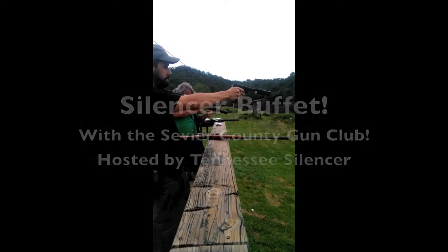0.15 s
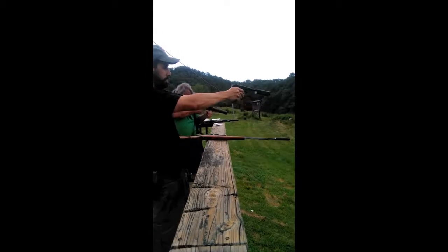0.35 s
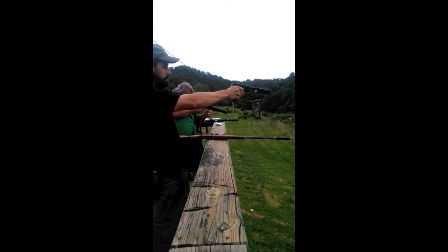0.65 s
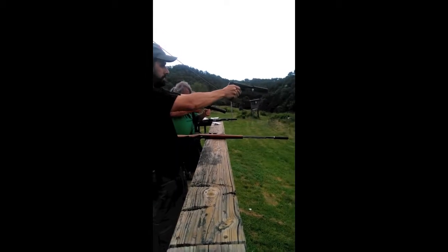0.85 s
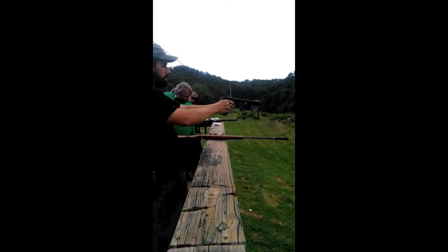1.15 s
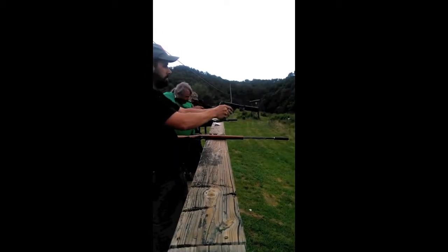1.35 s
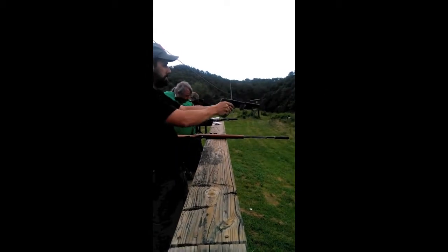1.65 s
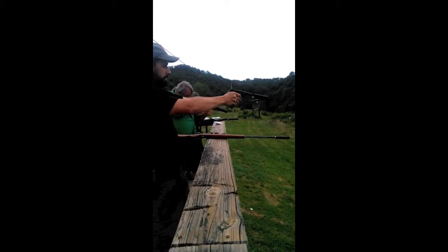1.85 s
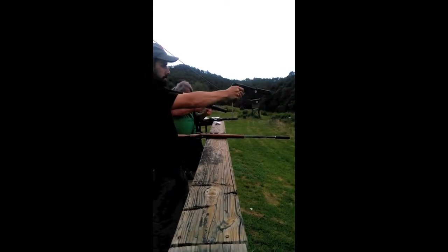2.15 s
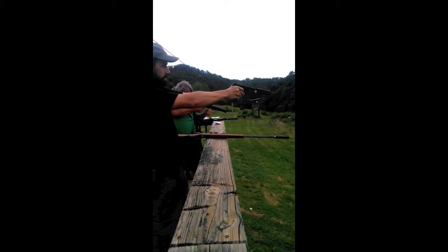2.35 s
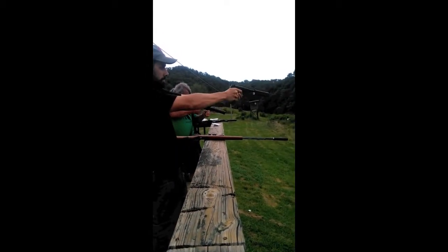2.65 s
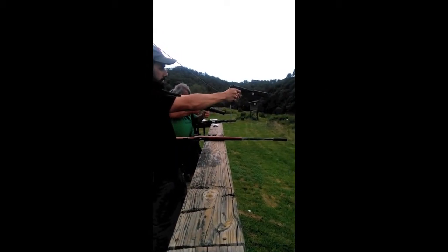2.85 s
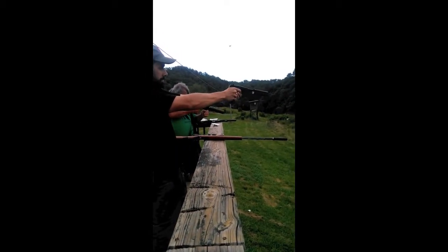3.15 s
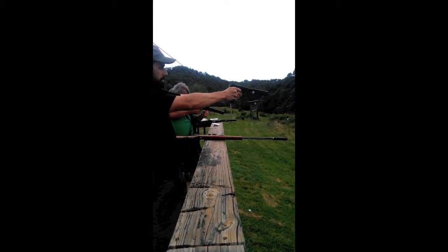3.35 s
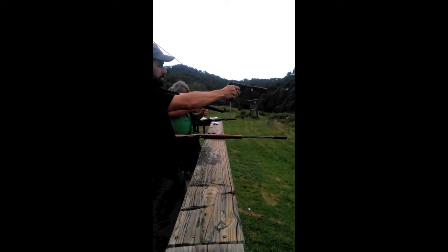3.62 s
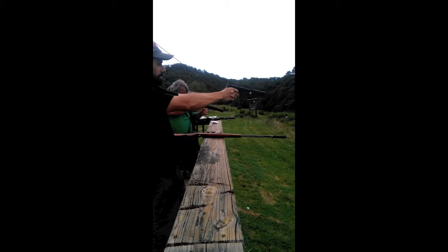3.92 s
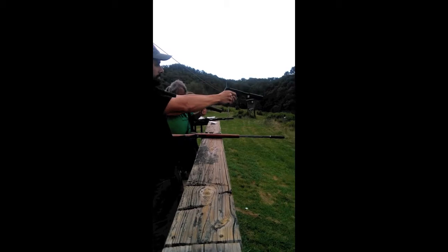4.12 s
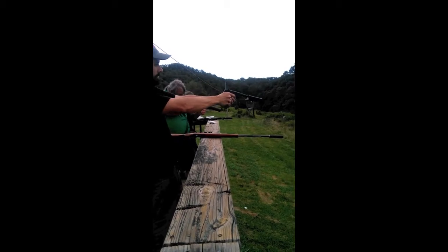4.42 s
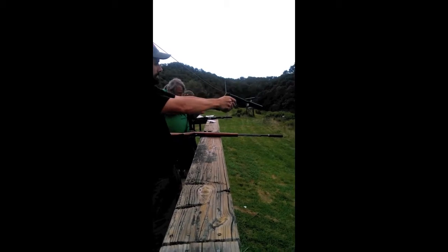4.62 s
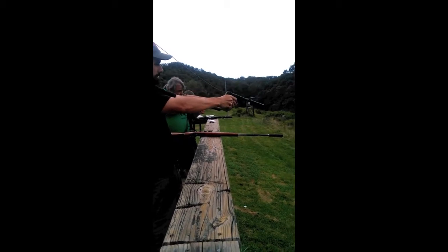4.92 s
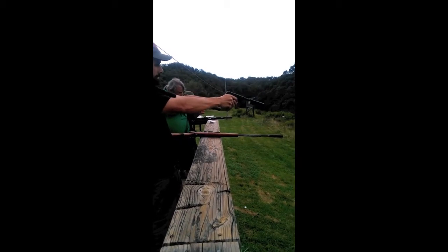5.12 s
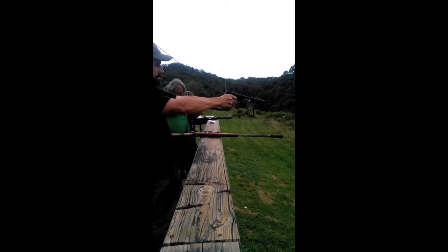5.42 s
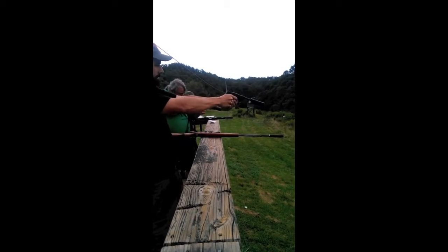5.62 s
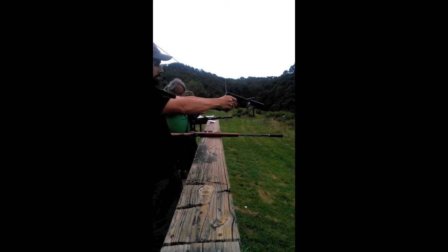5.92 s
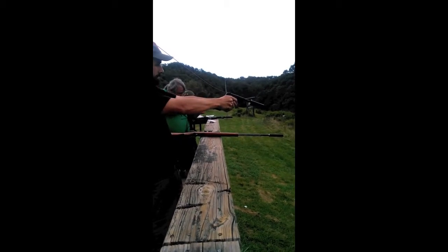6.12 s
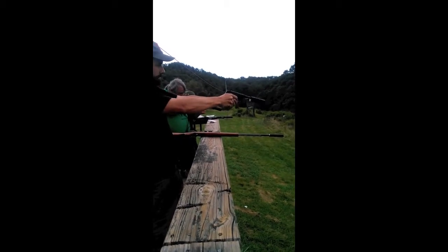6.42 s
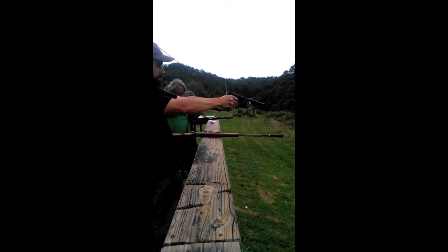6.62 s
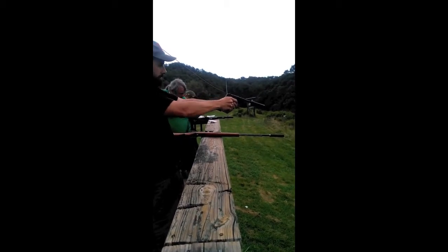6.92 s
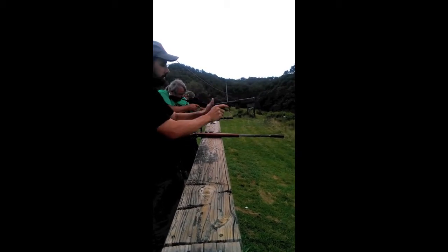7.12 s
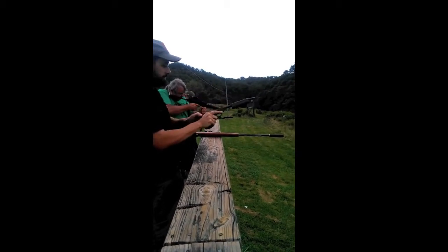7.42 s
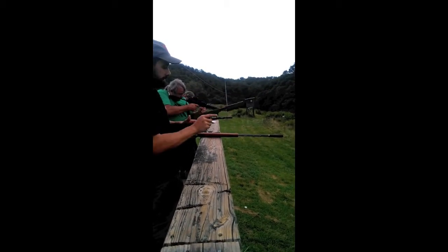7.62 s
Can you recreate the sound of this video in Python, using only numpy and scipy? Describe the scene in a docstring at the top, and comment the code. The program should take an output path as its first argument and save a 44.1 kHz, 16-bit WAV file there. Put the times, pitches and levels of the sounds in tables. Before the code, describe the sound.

A suppressed pistol right beside the microphone fires four widely spaced shots, each a harsh, clipped burst of gas followed at once by a slide clack and brief high steel ring. Neighbouring guns crack dryly, loudest in a tight cluster after three seconds. Distant bullet impacts, soft wooded-hill echoes, faint wind and a whistling finch fill the gaps. Near the end the pistol is handled and its slide clanks shut.

```python
"""Suppressed guns on a grassy range

A pistol beside the microphone overloads it: noise bursts for blast and slide, ringing sines for steel. Noise
bursts also make the neighbours' shots, bullets smacking into the berm, gun handling and bullets landing far
down the range. Wooded hills answer with soft swells of noise, and open-air scatter surrounds the shots. A finch
sings in gliding whistles; cloth rubs once, and near the end the pistol is handled. Below it all lies the faint
noise of wind and foliage."""
import sys
import numpy as np
from scipy import signal
from scipy.fft import rfft, irfft
from scipy.io import wavfile
from scipy.ndimage import map_coordinates

SR = 44100
rng = np.random.default_rng(int(sys.argv[2]) if len(sys.argv) > 2 else 0)


def pcm_store(signal):
    """Save signal as 16-bit PCM."""
    levels = np.round(np.clip(np.atleast_2d(signal), -1, 1) * 32767)
    wavfile.write(sys.argv[1], SR, levels.astype(np.int16).T)


N = 342216
TIME = np.arange(SR) / SR  # one second of time steps [s]

# rounds of the near pistol: (time [s], blast level [dB], slide shuts after [s], slide level [dB],
# steel ring level [dB], gas gust level [dB])
PISTOL_ROUNDS = [(0.8343, -3, 0.032, -12.5, -4, -35.5), (3.59, -2, .036, -12.5, -2.5, -36),
                 (5.507, -0.5, .036, -18, -4, -8.5), (6.4794, -2, 0.031, -19.5, -2.5, -43.5)]
# the slide dropped by hand: (time [s], steel ring level [dB])
SLIDE_DROP = (7.653, -7.5)
# sharp cracks far down the range, probably bullets on something hard:
# (time [s], level [dB], tilt [dB per octave], echo level [dB], echo's time to fall 60 dB [s])
FAR_CRACKS = [(1.482, -39.5, 4.5, -51, 1.15), (4.224, -37.5, -1, -44.5, .58)]
# colour of metal parts striking: (frequency [Hz], level [dB])
METAL_COLOUR = [(60, -26), (450, -27), (900, -23), (1700, -16.5), (3000, -4.5), (5200, -1.5), (7000, -3.5),
                (10000, -8), (14500, -18)]
# colour of dull thuds and the muzzle pop: (frequency [Hz], level [dB])
THUD_COLOUR = [(100, -14.5), (450, -3), (800, 2.5), (1200, -17.5), (1600, -19.5), (3000, -11.5),
               (12000, -41.5)]


def pistol(ripple_db):
    """Gas leaves the suppressor, the slide runs back to its stop, then slams shut."""
    # colour of the blast: (frequency [Hz], level [dB])
    blast_colour = [(30, -26.5), (60, -4.5), (200, -12.5), (550, -20.5), (850, -12), (1400, -18),
                    (2300, -11.5), (3300, -7.5), (4800, -8.5), (6300, -1.5), (8000, -5), (11000, -7.5),
                    (14500, -15.5)]
    out = np.zeros((2, N))
    for s, blast_db, cycle_s, slide_db, _, _ in PISTOL_ROUNDS:
        blast = burst(blast_colour, .16, rise_s=.0015, ragged_db=2.1, ripple_db=ripple_db)
        add(out, s, amp(blast_db) * blast)
        muzzle_pop = burst(THUD_COLOUR, .04)
        add(out, s, amp(blast_db - 15) * muzzle_pop)
        slide_stop = burst(METAL_COLOUR, .065, ripple_db=ripple_db)
        add(out, s + .65 * cycle_s, amp(slide_db - 3.5) * slide_stop)
        slide_slam = burst(METAL_COLOUR, .11, ripple_db=ripple_db)
        add(out, s + cycle_s, amp(slide_db) * slide_slam)
    return out


def close_up():
    """Ringing steel and gusts of gas: strong at the microphone, but they hardly carry."""
    out = np.zeros((2, N))
    for s, _, cycle_s, _, ring_db, gust_db in PISTOL_ROUNDS:
        add(out, s, amp(gust_db) * gust())
        add(out, s + cycle_s, amp(ring_db) * ring())
    drop_s, drop_db = SLIDE_DROP
    add(out, drop_s, amp(drop_db) * ring())
    return out


def ring(spread=.35):
    """The pistol's steel modes beat together; each reaches the two microphones in its own phase."""
    # ways the steel vibrates: (frequency [Hz], level [dB], time to fall 60 dB [s])
    steel_modes = [(1616, -37, 0.19), (4195, -24.5, 0.16), (4845, -21.5, .1), (6500, -23, .12),
                   (7900, -24, .1), (8590, 0, 0.12), (8759, -18, 0.089), (9340, -8, 0.089),
                   (9490, -2, 0.11), (9720, -14, 0.12), (9785, -9.5, 0.1), (9760, -5.5, 0.15),
                   (11570, -16.5, 0.14)]
    shared_phase = rng.random((len(steel_modes), 1, 1))
    phases = shared_phase + spread * rng.uniform(-1, 1, (len(steel_modes), 2, 1))  # in turns
    modes = 0
    for (hz, db, t60), phase in zip(steel_modes, phases):
        modes = modes + amp(db - 60 * TIME / t60) * np.sin(2 * np.pi * (hz * TIME + phase))
    return modes * (1 - np.exp(-TIME / .0016))


def gust(hz=62, crest_s=.019, width_s=.0099, edge=.27):
    """A puff of muzzle gas swings the diaphragms through a few lopsided cycles, the right one first."""
    left_right_delay = np.array([[.0012], [0]])
    turn = 2 * np.pi * hz * (TIME - crest_s - left_right_delay)
    swing = -np.cos(turn) + edge * np.sin(2 * turn) * np.exp(-TIME / .032)
    hump = (1 - np.exp(-TIME / .003)) / (1 + ((TIME - crest_s) / width_s) ** 4)
    return pan(-6.5) * swing * hump


def spring(hz=1626, db=-45, t60=.81):
    """A thin steel note, probably the recoil spring, sings on after the slide is dropped."""
    out = np.zeros((2, N))
    note = np.sin(2 * np.pi * hz * TIME) * (1 - np.exp(-TIME / .039))
    add(out, SLIDE_DROP[0], amp(db - 60 * TIME / t60) * note)
    return out


def neighbours(ripple_db):
    """The other guns along the line crack dryly, and bullets smack into the berm about 0.135 s after some
    shots: short bursts of coloured noise."""
    # shots, and bullets striking the berm (at 3.1594, 5.6438 and 6.6144 s): # (time [s], level [dB], time to
    # fall 60 dB [s], tilt [dB per octave], left-right [dB])
    shots = [(2.7738, -20, 0.089, 0, -2), (3.0266, -1, .2, 1, 2), (3.064, -6, .12, 0.5, -1.5),
             (3.1594, -7.5, .075, -3, 3), (5.478, -22, 0.14, 1, -1), (5.6438, -10, 0.071, -0.5, 2.5),
             (6.6144, -11, 0.087, -1, -0.5), (6.625, -18, 0.026, -2, 0), (6.786, -3.5, 0.033, 0.85, -1)]
    # colour of a shot: (frequency [Hz], level [dB])
    report_colour = [(40, -18.5), (200, -13), (450, -18.5), (850, -11.5), (1500, -10.5), (2500, -6.5),
                     (3700, 2.5), (4500, -2.5), (6000, -2), (8000, -4), (11000, -7.5), (14500, -16.5)]
    out = np.zeros((2, N))
    for s, db, t60, tilt_db, side_db in shots:
        report = burst(report_colour, t60, tilt_db, ripple_db=ripple_db, ripple_hz=170.3)
        add(out, s, amp(db) * pan(side_db) * report)
    return out


def handling(ripple_db):
    """Gun parts strike and click as short metal bursts; the pistol's jolts add low thumps."""
    # hard blows of bolts, magazine and slide:
    # (time [s], level [dB], time to fall 60 dB [s], tilt [dB per octave], left-right [dB])
    clacks = [(1.892, -33.5, .07, -8, 1.5), (2.51, -51, .057, -5.5, 6), (3.1318, -12, 0.057, -1.5, -3),
              (7.496, -20.5, 0.023, 0.5, -3.5), (7.53, -30, .065, -1.5, -9), (7.546, -4, 0.037, .5, -1.5),
              (7.652, -7.5, 0.066, -2, -3.5)]
    # light clicks of triggers and catches along the bench: (time [s], level [dB], left-right [dB])
    clicks = [(.587, -36, 7), (.686, -48, 14), (1.56, -34, 14), (2.564, -45, 0), (2.745, -47, 1.5),
              (2.992, -41, -3.5), (4.044, -40, 8), (4.067, -43, 14), (4.684, -49, -9), (5.285, -51, 13),
              (7.057, -48, 0), (7.319, -46, 0), (7.394, -44.5, -1)]
    # the pistol jolts in the hands: (time [s], level [dB], time to fall 60 dB [s])
    jolts = [(7.547, -42, 0.1), (7.654, -39.5, .16)]
    # colour of a jolt: (frequency [Hz], level [dB])
    jolt_colour = [(25, -6), (60, 1), (130, -1), (300, -8), (700, -24), (2000, -45), (12000, -70)]
    out = np.zeros((2, N))
    for s, db, t60, tilt_db, side_db in clacks:
        clack = burst(METAL_COLOUR, t60, tilt_db, ripple_db=ripple_db, ripple_hz=169.7)
        add(out, s, amp(db) * pan(side_db) * clack)
    for s, db, side_db in clicks:
        click = burst(METAL_COLOUR, t60=.04, tilt_db=2, ripple_db=ripple_db)
        add(out, s, amp(db) * pan(side_db) * click)
    for s, db, t60 in jolts:
        add(out, s, amp(db) * burst(jolt_colour, t60, rise_s=.0017))
    return out


def scuff(grain_db=3):
    """A short, soft, grainy rub of cloth, perhaps a sleeve on the bench."""
    # the rub: (time at its height [s], half width [s], level [dB])
    s, width_s, db = (4.94, .038, -54.5)
    # colour of rubbed cloth: (frequency [Hz], level [dB])
    cloth_colour = [(300, -23), (1400, -17), (2200, 1), (3100, 0), (4300, -12.5), (8000, -16), (14000, -30)]
    hump = np.exp(-.5 * ((np.arange(N) / SR - s) / width_s) ** 2)
    return amp(db + grain_db * wander(N, 300)) * noise(cloth_colour, N) * hump


def finch(leaves_db=-3, leaves_t60=.12):
    """Phrases of whistled syllables, blurred by reflections among the trees."""
    # phrases: (time [s], names of the syllables, pitch factor, level [dB])
    song = [(.165, "low", .88, -49), (.275, "scoop", .91, -46), (.45, "low", .85, -53),
            (.518, "rise hook", .9, -45.5), (1.08, "rise fall", .86, -46), (1.35, "low tip", 1.0, -51),
            (1.52, "low tip", 1.0, -48), (1.79, "hold warble", 0.99, -47.5), (2.03, "fall", 1.1, -53),
            (2.065, "hold warble", 0.98, -47.5), (2.3, "slur", 0.99, -45), (2.46, "hold", 1.03, -58),
            (2.59, "slur", .99, -49), (5.815, "droop", .99, -46), (6.022, "droop", 1.0, -47),
            (6.228, "scoop", 1.01, -43.5), (6.422, "low", 0.99, -46),
            (6.912, "fall rise hook", 0.99, -42.5), (7.202, "fall rise hook", 0.99, -42)]
    gap_s = .019  # between syllables
    out = np.zeros((2, N))
    for s, phrase, factor, db in song:
        for name in phrase.split():
            whistle = syllable(name, factor)
            add(out, s, amp(db) * whistle)
            s = s + len(whistle) / SR + gap_s
    # about 500 chance reflections a second, from 6 ms on
    hits = (rng.random((2, SR)) < 500 / SR) * (TIME > .006)
    leaves = rng.standard_normal((2, SR)) * hits * amp(-60 * TIME / leaves_t60)
    leaves = leaves / np.linalg.norm(leaves, axis=1, keepdims=True)
    return out + amp(leaves_db) * signal.fftconvolve(out, leaves, axes=1)[:, :N]


def syllable(name, factor, waver=.012, flutter_db=3.5, swell_db=7):
    """One fluttering whistle that glides through its pitches and swells to a single height."""
    # syllables by name: (length [s], pitches at even steps [Hz], where it is loudest [0-1])
    syllables = {"fall": (.045, [6500, 5400, 4600, 4150], .45), "droop": (.05, [4900, 5000, 4600, 3950],
                 .55), "rise": (.063, [4080, 5470, 6200, 6450], .6),
                 "hook": (.078, [7400, 5700, 5380, 5200], .65),
                 "scoop": (.1, [7600, 7600, 6200, 5600, 5950, 6350], .72), "low": (.055, [4450, 4300, 4100],
                 .5), "tip": (.05, [6050, 5750, 5650], .5), "hold": (.07, [3540, 3620, 3720], 0.72),
                 "warble": (.048, [4200, 5200, 4400, 5150, 4600, 3750], .55),
                 "slur": (.115, [6400, 6350, 5910, 4890, 4430], .75)}
    length_s, pitches, loudest = syllables[name]
    u = np.linspace(0, 1, round(length_s * SR))  # progress from start to end
    steps = [u * (len(pitches) - 1)]
    glide = map_coordinates(np.array(pitches, float), steps, order=2, mode="nearest")
    hz = factor * glide * (1 + waver * wander(SR, 100)[:len(u)])
    flutter = flutter_db * wander(SR, 350)[:len(u)]
    level = amp(flutter - 2 * swell_db * abs(u - loudest))
    soft_ends = abs(np.sin(np.pi * u)) ** .5
    return level * soft_ends * np.sin(2 * np.pi * np.cumsum(hz) / SR)


def downrange():
    """Bullets land far away: sharp cracks and dull thuds, both bursts of noise."""
    # bullets landing far down the range: (time [s], level [dB], time to fall 60 dB [s])
    impacts = [(.495, -52, 0.32), (1.485, -50.5, 0.14), (1.545, -53, 0.088), (4.235, -57, .2),
               (4.277, -43.5, 0.094), (4.475, -54, 0.16), (4.635, -46.5, 0.16)]
    out = np.zeros((2, N))
    for s, db, tilt_db, _, _ in FAR_CRACKS:
        add(out, s, amp(db) * burst(METAL_COLOUR, .23, tilt_db))
    for s, db, t60 in impacts:
        add(out, s, amp(db) * burst(THUD_COLOUR, t60, rise_s=.0025))
    return out


def hills():
    """Reports come back from the wooded slope, far cracks from the tree line, after fixed delays."""
    # the loudest neighbour is answered far more strongly: (time of the shot [s], echo level [dB])
    rifle_echo = (3.0265, -41.5)
    # an earlier shot still dying away at the start: (level [dB], time to fall 60 dB [s])
    roll_db, roll_t60 = (-36.5, .95)
    # colour of the echoes: (frequency [Hz], level [dB])
    hills_colour = [(60, -1), (300, -4.5), (1200, -18.5), (2200, -7.5), (3700, -2.5), (6000, -2.5),
                    (9000, -8), (14000, -28.5)]
    slope_delay_s, slope_rise_s, slope_t60 = .405, .085, .36
    slope_db = -52.5  # relative to the pistol's blast
    treeline_delay_s, treeline_rise_s = .15, .032
    reports = [(s, blast_db + slope_db) for s, blast_db, *_ in PISTOL_ROUNDS] + [rifle_echo]
    slope = sum(swell(s + slope_delay_s, db, slope_rise_s, slope_t60) for s, db in reports)
    treeline = sum(swell(s + treeline_delay_s, db, treeline_rise_s, t60)
                   for s, _, _, db, t60 in FAR_CRACKS)
    roll = amp(roll_db - 60 * np.arange(N) / SR / roll_t60) ** 2
    slope_noise = noise(hills_colour, N, tilt_db=-2)  # the long path dulls it
    return slope_noise * np.sqrt(slope) + noise(hills_colour, N) * np.sqrt(treeline + roll)


def swell(s, db, rise_s, t60):
    """Power of an echo that builds up to time s and then dies away."""
    t = np.arange(N) / SR - s
    build_up = np.exp(-(np.minimum(t, 0) / rise_s) ** 2)
    return amp(db - 60 * np.maximum(t, 0) / t60) ** 2 * build_up


def field(x, wet_db=-15):
    """Open-air scatter: a quick splash from nearby, then a long faint hiss."""
    # scatter from benches, grass and trees: (time after the sound [s], level [dB])
    scatter = [(0, 3), (.025, 2), (.06, -11), (.12, -16.5), (.25, -25), (.4, -37), (.6, -48), (1, -62.5)]
    # colour of the scatter: (frequency [Hz], level [dB])
    field_colour = [(40, -1.5), (200, -2), (800, -6), (1600, -0.5), (3500, -4), (6500, 0.5), (10000, -5),
                    (14500, -7)]
    fading = amp(np.interp(TIME, *np.transpose(scatter)))
    tail = noise(field_colour) * fading * (1 - np.exp(-TIME / .0029))
    tail = tail / np.linalg.norm(tail[0])
    return amp(wet_db) * signal.fftconvolve(x, tail, axes=1)[:, :N]


def patchy(x, depth_db, patch_hz=500, patch_s=.03):
    """Uneven ground and foliage make a sound swell and fade in patches of time and pitch."""
    hz, t, spectrum = signal.stft(x, SR, nperseg=512)
    where = np.meshgrid(hz / patch_hz, t / patch_s, indexing="ij")
    chance = rng.standard_normal(spectrum.shape[1:])
    patches = map_coordinates(chance, where, order=1, mode="mirror")
    _, uneven = signal.istft(spectrum * amp(depth_db * patches), SR, nperseg=512)
    return uneven[:, :x.shape[1]]


def air(level_db=-58, swell_db=.84):
    """Faint wind rumble and far foliage: coloured noise that slowly swells."""
    # colour of the still air: (frequency [Hz], level [dB])
    air_colour = [(15, -22), (35, -5.5), (55, 1), (90, -2.5), (130, -4), (350, -10.5), (900, -21),
                  (2300, -26), (4700, -29.5), (8700, -26.5), (14000, -35)]
    slow_level = amp(level_db + swell_db * wander(N, 10000))
    return slow_level * patchy(noise(air_colour, N), 3.3, patch_hz=700, patch_s=.086)


def burst(colour, t60, tilt_db=0, rise_s=.0007, ragged_db=2.5, ripple_db=2, ripple_hz=85):
    """A sudden blow, coloured by its own chance resonances, that dies away in millisecond lumps."""
    t = TIME[:SR // 2]
    resonances = amp(ripple_db * wander(len(t) // 2 + 1, ripple_hz * t[-1]))
    x = irfft(rfft(noise(colour, len(t), tilt_db)) * resonances, len(t))
    fading = amp(ragged_db * wander(len(t), 70) - 60 * t / t60)
    return x / x.std() * (1 - np.exp(-t / rise_s)) * fading


def noise(colour, size=SR, tilt_db=0):
    """Two channels of coloured noise at unit level, partly opposed in the bass."""
    # how alike left and right are: (frequency [Hz], likeness [-1 opposed to 1 same])
    likeness = [(60, -0.83), (300, -0.86), (700, -0.6), (1400, 0.1), (3000, -0.01), (14000, 0)]
    hz = np.fft.rfftfreq(size, 1 / SR)
    a, b = rfft(rng.standard_normal((2, size)))
    same = np.clip(read(likeness, hz), -1, 1)
    right = same * a + np.sqrt(1 - same ** 2) * b
    tilt = tilt_db * np.log2(np.clip(hz, 700, None))  # tilts only above 700 Hz
    x = irfft(np.array([a, right]) * amp(read(colour, hz) + tilt), size)
    return x / x.std()


def wander(size, span):
    """Chance wandering of about unit size that changes about once in span points."""
    knots = rng.standard_normal(size // 2 + 4)
    path = map_coordinates(knots, [np.arange(size) / max(span, 2)], order=1)
    return np.clip(path * 1.3, -2.5, 2.5)


def amp(db):
    """Turns decibels into gain."""
    return 10 ** (np.asarray(db) / 20)


def pan(db):
    """Gains of the two channels for a left-right difference in decibels."""
    return amp(np.array([[db], [-db]]) / 2)


def read(points, hz):
    """Reads a table between its points, on a logarithmic frequency axis."""
    f, value = np.transpose(points)
    return np.interp(np.log(hz + 1), np.log(f + 1), value)


def add(mix, s, sound):
    """Lays a sound into the mix at time s."""
    part = mix[:, max(round(s * SR), 0):][:, :sound.shape[-1]]
    part += sound[..., :part.shape[1]]


def scene():
    """All sources, their scatter over the field, and the still air."""
    near = pistol(ripple_db=2.5) + neighbours(ripple_db=3.5) + handling(ripple_db=4)
    # summed over all directions, the resonances even out
    radiated = pistol(0) + neighbours(0) + handling(0)
    close = close_up()
    far = field(radiated + amp(-11) * close) + downrange() + hills()
    return near + close + spring() + scuff() + patchy(far, 3.9) + finch() + air()


def record(dry, ceiling=.83):
    """Unequal microphone ports, soft overload at the ceiling, then the band limit."""
    # balance of the microphone pair: (frequency [Hz], left-right [dB])
    balance = [(60, 1), (250, 3), (700, 3.5), (1500, 2), (4200, 7), (7500, 4), (10000, -8.5), (14000, -6)]
    lean_db = read(balance, np.fft.rfftfreq(N, 1 / SR))
    ported = irfft(rfft(dry) * amp(np.array([lean_db, -lean_db]) / 2), N)
    clipped = ported / (1 + (ported / ceiling) ** 4) ** (1 / 4)
    edge_hz = 14450
    lowpass = signal.firwin(401, edge_hz, window=("kaiser", 8), fs=SR)
    return signal.oaconvolve(clipped, lowpass[None], "same")


dry = scene()
out = record(dry)
pcm_store(out)
```